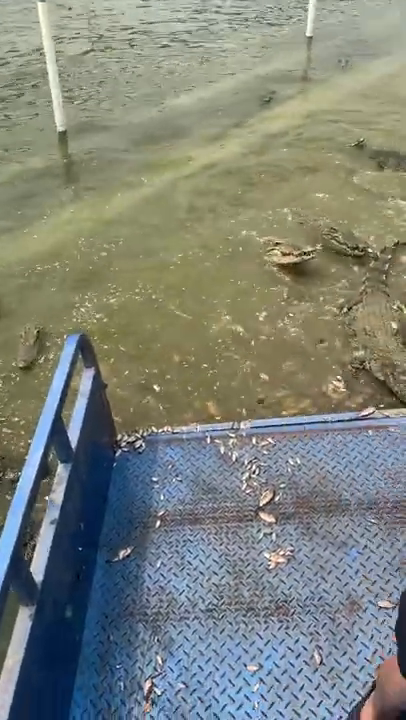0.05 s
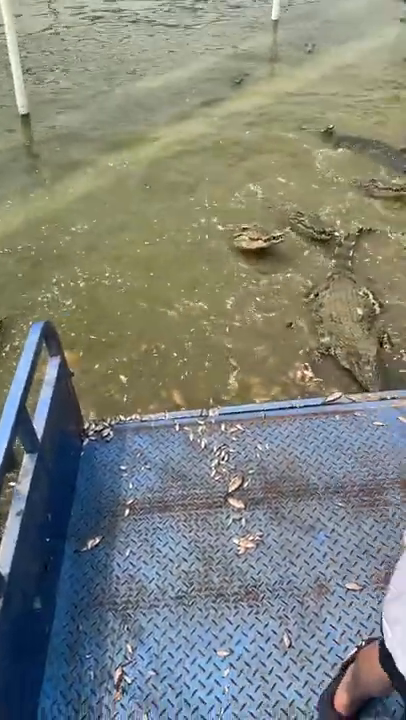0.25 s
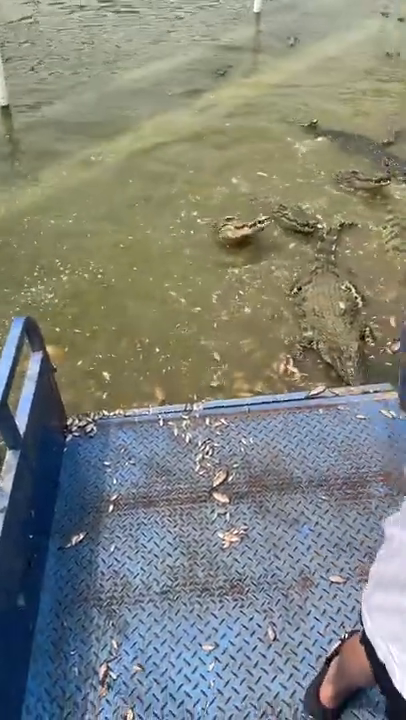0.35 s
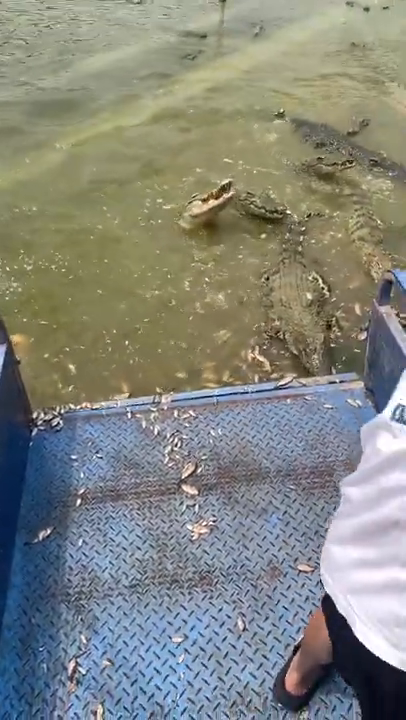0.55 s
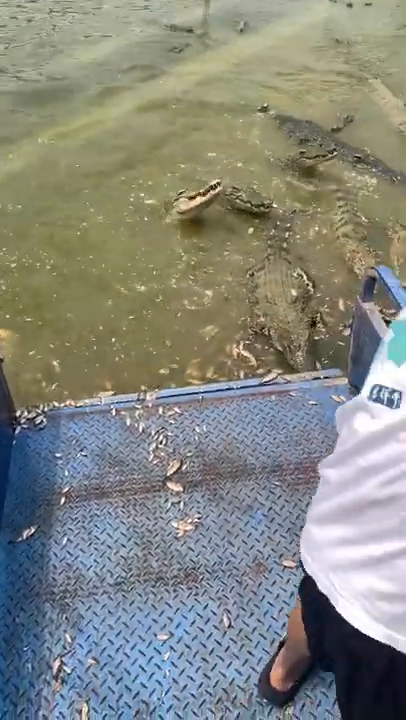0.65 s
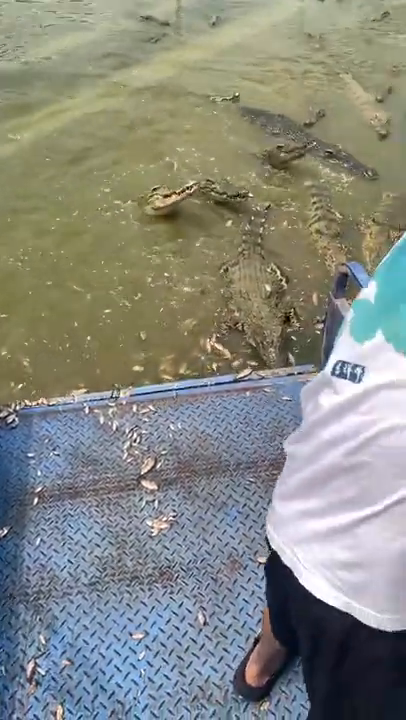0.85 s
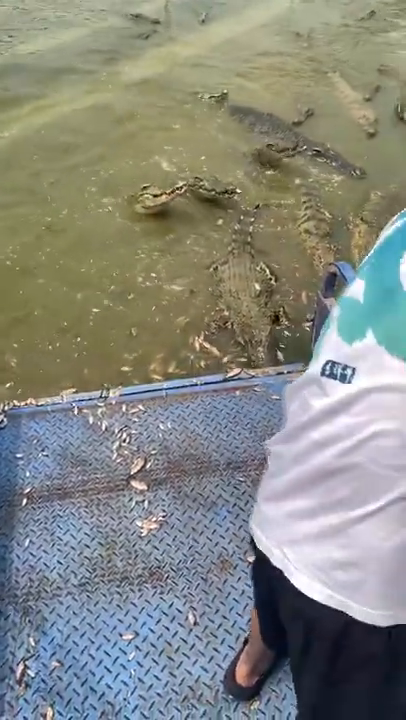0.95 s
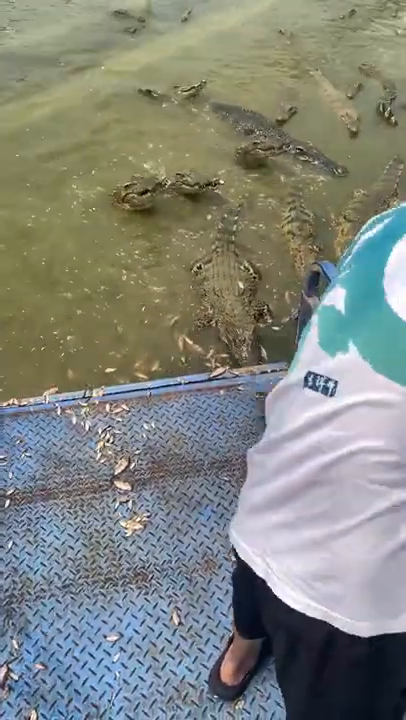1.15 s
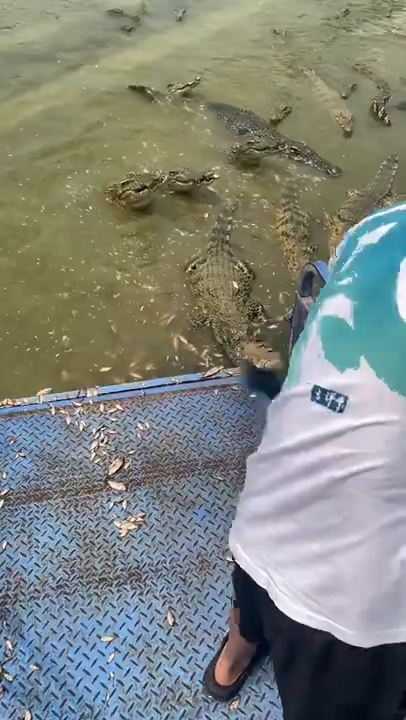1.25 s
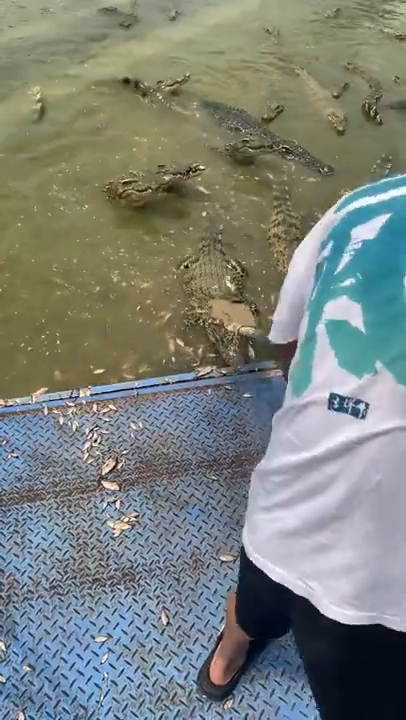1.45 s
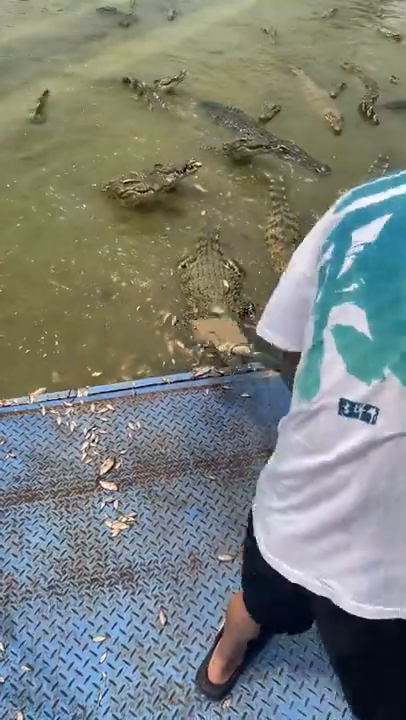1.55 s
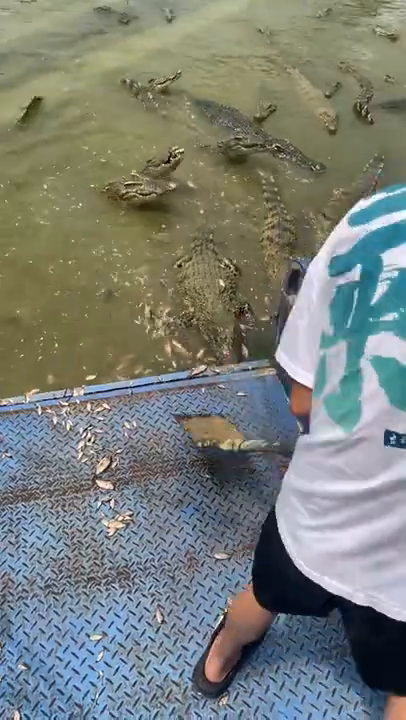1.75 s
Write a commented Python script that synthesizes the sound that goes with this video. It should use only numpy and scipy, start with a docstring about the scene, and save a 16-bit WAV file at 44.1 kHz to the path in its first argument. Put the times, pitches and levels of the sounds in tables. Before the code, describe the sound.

Gritty scraping of a scoop through pellets, with knocks, low metal booms and faint lapping water.

```python
"""Knocks, deep booms and a gritty scrape: a scoop digs through dry feed on a steel deck by a pond.
The scoop knocks into the load, is pushed through it and hums as it is lifted clear.
Pellets grind and hiss along the ringing scoop, the deck booms under the knocks, and a few pellets drop.
Water laps, drips and splashes over a low rumble. A phone with two microphone openings is close by."""
import sys
import numpy as np
from scipy import signal
from scipy.fft import rfft, irfft
from scipy.io import wavfile
from scipy.ndimage import uniform_filter1d

SR = 44100
rng = np.random.default_rng(int(sys.argv[2]) if len(sys.argv) > 2 else 0)


def generate_wav(sig):
    """Save sig (samples, or channels by samples) to the path in sys.argv[1] as 16-bit PCM at SR."""
    pcm = np.round(np.clip(np.atleast_2d(sig).T, -1, 1) * 32767).astype(np.int16)
    wavfile.write(sys.argv[1], SR, pcm)


N = 79380

# how loudly the pond splashes: t/s, level/dB
SPLASH = [(0, -39), (.1, -41.5), (.16, -41.5), (.33, -35.5), (.42, -47.5), (.53, -46), (.6, -53),
          (1.2, -41), (1.6, -52.5), (1.69, -41.5), (1.8, -48)]
# the tone colour of a sharp click: f/Hz, level/dB
CLICK_COLOUR = [(200, -37), (1500, -11), (3000, 7), (5000, 1), (8000, 3.5), (12000, -4.5), (15000, -29)]
# the notes the scoop rings with: f/Hz, level/dB, time to fade by 60 dB/s
SCOOP_NOTES = [(321, -4.5, 0.25), (395, -2, 0.072), (421, -17, 0.48), (705, -8.5, 0.39), (1005, -15, 0.18),
               (1085, -3, 0.33), (1195, -14, .35), (1380, -9, 0.31), (1500, -14, 0.62), (1470, -5.5, 0.25),
               (1888, 0.5, 0.28), (2360, 2.5, 0.16), (3070, -22, .17), (3798, -1.5, 0.19), (4470, -11, 0.2)]
# knocks of the scoop: t/s, thud/dB, clatter/dB, ring/dB, clatter fade time/s
KNOCKS = [(.217, -29, -13.5, -19, 0.013), (.243, -29, -21.5, -25, 0.011), (.29, -32, -38, -55, 0.02),
          (0.326, -28, -32, -30, 0.051), (.43, -24, -33, -41, 0.07), (0.4828, -41, -16.5, -31, 0.008),
          (0.4997, -42, -22.5, -38, 0.021), (1.175, -34, -19.5, -24, 0.017), (1.677, -70, -43, -53, 0.0077),
          (1.712, -48, -39.5, -36, 0.1)]
# the scoop drags on the floor under the feed: t/s, boom/dB, low scrape/dB
DRAG = [(.2, -53, -73), (.25, -29.5, -29), (.37, -27, -37), (.46, -19.5, -27.5), (.56, -23.5, -32.5),
        (.62, -23, -42), (.67, -25, -24.5), (.84, -22.5, -22), (.94, -30, -30), (1.05, -21, -32.5),
        (1.19, -25.5, -31.5), (1.3, -35, -39), (1.55, -38, -54), (1.8, -49, -67)]
# the stroke through the feed: t/s, grinding/dB, hiss/dB
STROKE = [(.6, -41, -64), (.65, -32.5, -32), (.77, -25.5, -30), (.89, -25, -30), (.98, -19.5, -26.5),
          (1.08, -19, -27.5), (1.19, -19, -30.5), (1.235, -24.5, -37), (1.33, -37.5, -42.5),
          (1.46, -42, -46.5), (1.6, -49, -54), (1.8, -57, -53)]


def amp(db):
    """Turn decibels into a gain."""
    return 10 ** (np.asarray(db) / 20)


def unit(x):
    """Scale a sound to an average power of 1."""
    return x / np.sqrt(np.mean(x ** 2) + 1e-18)


def clock():
    """The time of every sample, in seconds."""
    return np.arange(N) / SR


def curve(table, column=1):
    """A gain that follows one dB column of a table over time."""
    rows = np.array(table)
    return amp(np.interp(clock(), rows[:, 0], rows[:, column]))


def direct(x):
    """Sounds have two rows, direct and scattered; this fills only the direct one."""
    return np.array([x, np.zeros(N)])


def colour(x, points):
    """Give a sound a tone colour; white noise keeps its power."""
    size = 2 * N
    hz, db = np.array(points).T
    bins = np.fft.rfftfreq(size, 1 / SR)
    gain = unit(amp(np.interp(np.log(bins + 1), np.log(hz), db)))
    # fold the filter in time so that nothing sounds before its cause
    cepstrum = irfft(np.log(gain))
    cepstrum[1:N] *= 2
    cepstrum[N + 1:] = 0
    return irfft(rfft(x, size) * np.exp(rfft(cepstrum)))[..., :N]


def one_tap(notes):
    """After one tap, an object rings with several fading notes."""
    t = clock()
    return sum(amp(db) * np.cos(2 * np.pi * hz * t) * np.exp(-np.log(1000) * t / fade_s)
               for hz, db, fade_s in notes)


def ring(force, notes):
    """A force makes an object ring as if it were a string of tiny taps."""
    return signal.fftconvolve(force, one_tap(notes)[None], axes=1)[:, :N]


def grains(per_s, fade_s, spread_db):
    """Tiny bursts of noise, uneven in size, at random moments."""
    hits = rng.random(N) < per_s / SR
    sizes = amp(spread_db * np.clip(rng.standard_normal(N), -2, 2))
    power = signal.lfilter([1], [1, -np.exp(-1 / (fade_s * SR))], hits * sizes ** 2)
    return unit(np.sqrt(power + 1e-12) * rng.standard_normal((2, N)))


def burst(start, fade_s, rise_s=0.0014):
    """A level that jumps up and dies away."""
    age = np.maximum(clock() - start, 0)
    return (1 - np.exp(-age / rise_s)) * np.exp(-age / fade_s)


def push(start, length_s):
    """The smooth force of one blow; a longer one sounds duller."""
    force = np.exp(-2 * (2 * (clock() - start - length_s / 2) / length_s) ** 2)
    return direct(force / force.sum())


def drift(per_s):
    """A smooth random wander, roughly between -1 and 1."""
    size = int(SR / per_s)
    steps = np.repeat(rng.standard_normal(N // size + 1), size)
    return 1.17 * uniform_filter1d(steps, size)[:N]


def pond():
    """Water laps and sprays in tiny bursts over a low rumble."""
    # tone colours of the water and the rumble: f/Hz, level/dB
    water_colour = [(100, 4.5), (400, 2.5), (700, -7), (1150, 2.5), (2000, -2), (4000, -3.5), (6500, -5.5),
                    (8500, -11.5), (12000, -15), (15000, -17)]
    rumble_colour = [(20, -32), (40, -9.5), (60, 0), (92, 0), (140, -5.5), (250, -15), (500, -29),
                     (2000, -38), (12000, -47)]
    # how the rumble swells and dips: t/s, level/dB
    rumble_level = [(0, -30), (.2, -40), (.6, -30), (1, -34), (1.06, -64), (1.31, -45), (1.4, -33.5),
                    (1.8, -40)]
    spray = grains(per_s=460, fade_s=0.003, spread_db=0.5) * curve(SPLASH)
    rumble = colour(rng.standard_normal((2, N)), rumble_colour) * curve(rumble_level)
    return colour(spray, water_colour) + rumble


def bubbles():
    """Small bubbles ring and rise in pitch, louder when the water splashes."""
    middle_hz, cycles, rise = 1505, 13.5, 0.111
    out = np.zeros(N)
    for when, pitch, size in rng.random(size=(45, 3)):
        hz = middle_hz * 2 ** (3 * pitch - 1.5)
        age = np.clip((clock() - when * N / SR) * hz / cycles, 0, 8)  # counted in fade times
        tone = np.sin(2 * np.pi * cycles * age * (1 + rise * age / 2))
        out += size ** 2 * np.exp(-age) * tone * (age < age.max())
    return direct(amp(-10) * unit(out) * curve(SPLASH))


def ticks():
    """Single sharp ticks: water drops in the pond, pellets snapping or dropping on the deck, and the blade edge
    catching as the stroke begins."""
    # one tick a row: t/s, level/dB, fade time/s
    clicks = [(.006, -43, 0.019), (.088, -31, 0.0054), (0.184, -34.5, 0.0053), (0.216, -22, 0.0044),
              (.318, -47, 0.023), (.47, -35, 0.015), (0.513, -27, 0.005), (0.642, -22, 0.0037),
              (0.768, -16, 0.0025), (1.118, -15, 0.0053), (1.177, -19, 0.0055), (1.6324, -32, 0.0057),
              (1.645, -38, 0.021), (1.735, -33, 0.0027)]
    level = sum(amp(db) * burst(s, fade_s) for s, db, fade_s in clicks)
    return colour(level * rng.standard_normal((2, N)), CLICK_COLOUR)


def grit():
    """Hard pellets click one by one on the blade while the feed slides."""
    clicks = grains(per_s=110, fade_s=0.0008, spread_db=3)
    return colour(amp(-9.5) * clicks * curve(STROKE, column=2), CLICK_COLOUR)


def bite():
    """The edge catches with a thin metallic tick as the stroke begins."""
    hz, wobble = 11900, 0.045
    tone = np.sin(2 * np.pi * hz * np.cumsum(1 + wobble * drift(per_s=2000)) / SR)
    return direct(amp(-27) * burst(start=0.6415, fade_s=0.006) * tone)


def creaks():
    """The edge sticks and slips, making short, shaky tones that slide in pitch."""
    # one creak a row: t/s, length/s, first f/Hz, last f/Hz, level/dB
    slips = [(0.219, 0.053, 335, 275, -24), (0.253, 0.041, 700, 708, -25.5), (0.479, 0.009, 731, 628, -27),
             (0.633, 0.0615, 264.1, 319, -23.5), (1.158, 0.091, 332, 303, -25)]
    wobble, octave_db = 0.049, -13.5
    out = np.zeros(N)
    for start, length, from_hz, to_hz, db in slips:
        along = np.clip((clock() - start) / length, 0, 1)
        waver = unit(uniform_filter1d(rng.standard_normal(N), size=130))
        hz = (from_hz + (to_hz - from_hz) * along) * (1 + wobble * waver)
        phase = 2 * np.pi * np.cumsum(hz) / SR
        swell = np.sqrt(2 * np.abs(np.sin(np.pi * along)))
        out += amp(db) * swell * (np.sin(phase) + amp(octave_db) * np.sin(2 * phase))
    return direct(out)


def crunches():
    """Clumps of feed give way under the edge."""
    # one clump a row: t/s, level/dB, fade time/s
    clumps = [(.232, -31, 0.013), (0.515, -26, 0.012), (1.174, -12.5, 0.0058), (1.405, -33, 0.0075)]
    # the tone colour of a crunch: f/Hz, level/dB
    crunch_colour = [(300, -21), (1300, -11), (2300, 4), (3200, 3), (4500, -15), (12000, -39)]
    breaking = sum(amp(db) * burst(s, fade_s) for s, db, fade_s in clumps)
    return colour(breaking * grains(per_s=3400, fade_s=0.001, spread_db=2.5), crunch_colour)


def blade():
    """Grinding makes the thin blade shimmer with many weak high notes; it hums as it comes free."""
    # moments when the scoop comes free: t/s, level/dB
    releases = [(1.12, -21.5), (1.25, -30), (1.66, -45)]
    low_hz, high_hz, ring_s, hum_hz = 1002, 7985, 0.39, 174.6
    heights, sizes = rng.random(size=(60, 2)).T
    pitches = low_hz * (high_hz / low_hz) ** heights
    levels_db = 20 * np.log10(sizes + 0.072) - 12 * heights
    notes = [(hz, db, ring_s) for hz, db in zip(pitches, levels_db)]
    rubbing = rng.standard_normal((2, N)) * curve(STROKE)
    shimmer = amp(-6.5) * ring(rubbing, notes) / np.linalg.norm(one_tap(notes))
    hum_level = sum(amp(db) * burst(s, fade_s=0.11, rise_s=0.0091) for s, db in releases)
    return shimmer + direct(hum_level * np.sin(2 * np.pi * hum_hz * clock()))


def deck():
    """The steel deck booms under knocks and thumps, and the dragging scoop keeps it humming."""
    # the notes the deck rings with: f/Hz, level/dB, time to fade by 60 dB/s
    deck_notes = [(54.4, -18, 0.5), (92.5, -4, 0.33), (102.55, -3, 0.44), (125.4, -5, 0.4),
                  (166.9, -13, 0.88), (219, -33, 0.47), (311.8, -16.5, 0.28)]
    # dull thumps on the deck: t/s, level/dB
    thumps = [(0.029, -37), (0.396, -27), (0.427, -21), (0.449, -19), (0.5144, -5.5), (.6, -19.5),
              (0.679, -15.5), (0.816, -30), (1.008, -25.5), (1.121, -14)]
    evenness = 0.54  # 0 leaves the hum's random swells, 1 flattens them
    blows = sum(amp(db) * push(s, length_s=0.0055) for s, db in thumps)
    blows += sum(amp(db) * push(s, length_s=0.0021) for s, db, *_ in KNOCKS)
    rubbed = ring(rng.standard_normal((2, N)), deck_notes)
    swell = np.sqrt(uniform_filter1d(rubbed ** 2, size=900) + 1e-9)
    boom = ring(blows, deck_notes) + unit(rubbed / swell ** evenness) * curve(DRAG)
    # the plate gives off little deep bass
    return signal.sosfilt(signal.butter(4, 65, "high", fs=SR, output="sos"), boom)


def knocks():
    """Each knock rings the scoop and shakes the feed into a short clatter."""
    # the tone colour of the clatter: f/Hz, level/dB
    clatter_colour = [(60, -24.5), (200, -0.5), (350, -0.5), (520, -8), (750, -6.5), (1100, -16),
                      (2500, -15), (4000, -41), (8000, -42), (15000, -50)]
    shake = sum(amp(db) * burst(s, fade_s) for s, _, db, _, fade_s in KNOCKS)
    taps = sum(amp(db) * push(s, length_s=0.0011) for s, _, _, db, _ in KNOCKS)
    clatter = shake * grains(per_s=1100, fade_s=0.0027, spread_db=2)
    return colour(clatter, clatter_colour) + ring(taps, SCOOP_NOTES)


def loaded_scoop(force):
    """The shifting load shortens the scoop's ring and bends each note up and down."""
    bend, damping_per_s = 0.0092, 1.1
    out = 0
    for hz, db, fade_s in SCOOP_NOTES:
        bent_hz = hz * (1 + bend * drift(per_s=7))
        tone = np.exp(2j * np.pi * np.cumsum(bent_hz) / SR)
        kept = np.exp(-(np.log(1000) / fade_s + damping_per_s) / SR)  # ring left after one sample
        out += amp(db) * (tone * signal.lfilter([1], [1, -kept], force / tone)).real
    return out


def stroke():
    """Pellets grind on the scoop, ring it and hiss over each other; the edge scrapes low underneath."""
    # tone colours of the grinding, the hiss and the scrape: f/Hz, level/dB
    grind_colour = [(100, -14), (300, -3.5), (520, -2), (730, 4), (950, -1), (1400, -1.5), (1750, -1.5),
                    (2700, -2), (3500, -4), (4300, -9.5), (7000, -19.5), (15000, -33)]
    hiss_colour = [(300, -14), (1500, -4), (3000, 4), (4500, 3), (7000, 5), (8800, 1.5), (11000, -1),
                   (13000, -6), (15000, -7)]
    scrape_colour = [(120, -18), (240, -19), (315, -1.5), (360, -10), (412, 3), (490, -16.5), (700, -14.5),
                     (2000, -47)]
    effort = curve(STROKE)
    contacts = grains(per_s=5300, fade_s=0.0036, spread_db=-1)
    grind = colour(contacts * effort, grind_colour)
    ringing = amp(-8.5) * unit(loaded_scoop(contacts)) * effort
    hiss = grains(per_s=8300, fade_s=0.001, spread_db=1) * curve(STROKE, column=2)
    scrape = grains(per_s=650, fade_s=0.0061, spread_db=3) * curve(DRAG, column=2)
    return grind + ringing + colour(hiss, hiss_colour) + colour(scrape, scrape_colour)


def microphones(sound):
    """Direct sound reaches both openings a little out of step; scattered sound sets them apart."""
    # how the two openings compare: f/Hz, likeness/0-1, left minus right/dB
    balance = [(59, 0.91, -2.5), (130, 0.92, 3), (300, 0.66, -1.5), (905, 0.97, -4), (1350, .8, -2.5),
               (2000, 0.28, -2), (4000, 0.35, 1.9), (4810, 1, -3.5), (5930, 0.38, 2), (6800, 1, 0),
               (8300, 0.32, -2.5), (9500, 1, 6.5), (12000, 1, -1), (12300, 1, -0.5), (15000, 1, -0.5)]
    # how far the left one is ahead: f/Hz, phase/radians
    left_lead = [(0, 0), (130, -.35), (300, -.85), (950, -1.2), (1450, -.1), (1900, .6), (2300, -1.9),
                 (3000, -2.2), (3900, -3.5), (5300, -3), (6600, -.1), (7600, .1), (9200, 2.9), (10200, 3.4),
                 (11800, 6.2), (13400, 6.4), (14300, 9.2), (15500, 9.5)]
    bins = np.fft.rfftfreq(2 * N, 1 / SR)
    hz, *columns = np.array(balance).T
    likeness, tilt_db = (np.interp(bins, hz, column) for column in columns)
    lead = np.interp(bins, *np.array(left_lead).T)
    shared, scattered = rfft(sound, 2 * N)
    side = np.array([[1], [-1]])  # left, right
    both = shared * np.sqrt((1 + likeness) / 2) + side * scattered * np.sqrt((1 - likeness) / 2)
    return irfft(both * amp(side * tilt_db / 2) * np.exp(1j * side * lead / 2))[:, :N]


def scene():
    """All the sounds together, as they reach the phone."""
    digging = deck() + knocks() + crunches() + creaks() + bite() + stroke() + grit()
    return microphones(digging + ticks() + pond() + blade() + bubbles())


def record(dry):
    """The phone cuts the deepest bass and the highest treble."""
    low_hz, top_hz = 35, 14600
    thin = signal.sosfilt(signal.butter(2, low_hz, "high", fs=SR, output="sos"), dry)
    return signal.sosfilt(signal.ellip(8, .2, 70, top_hz, fs=SR, output="sos"), thin)


dry = scene()
out = record(dry)
generate_wav(out)
```